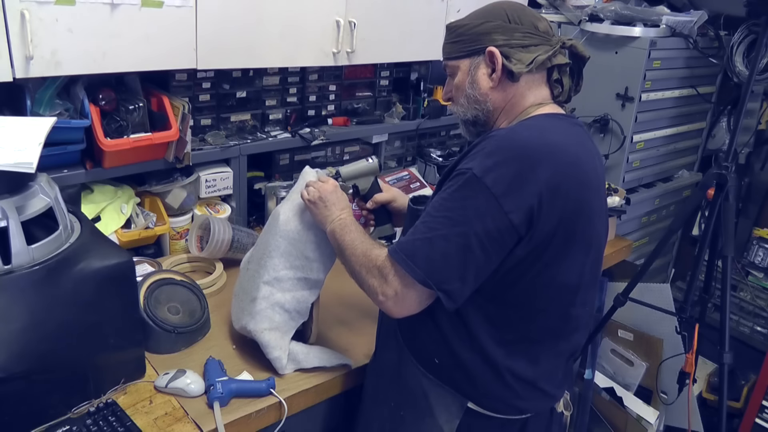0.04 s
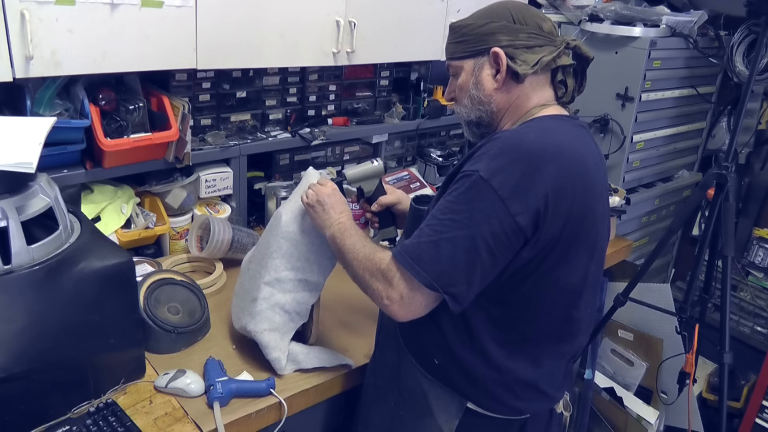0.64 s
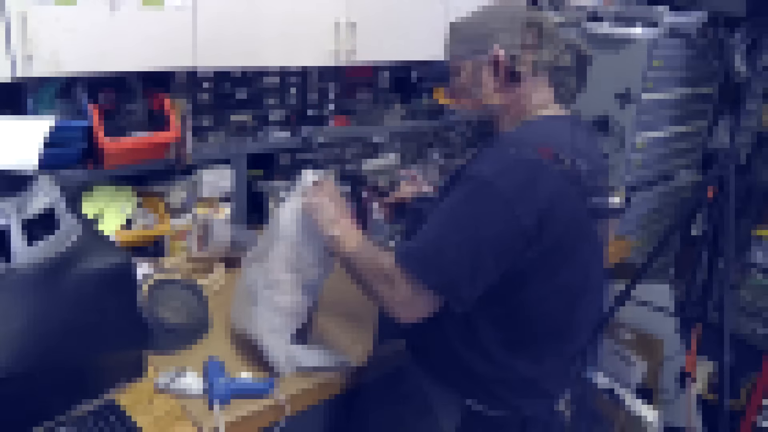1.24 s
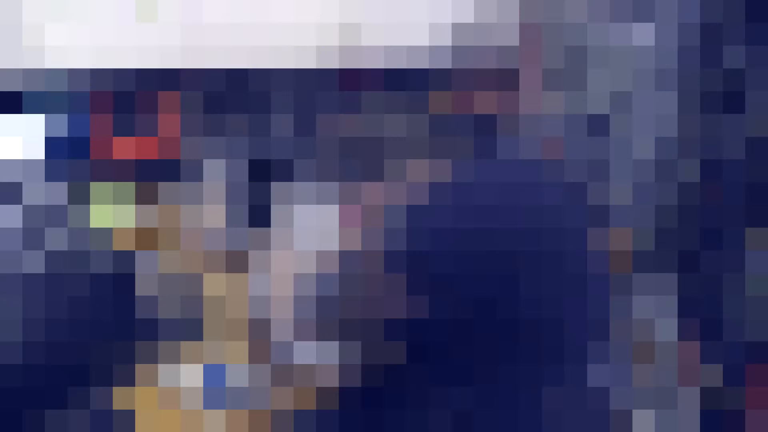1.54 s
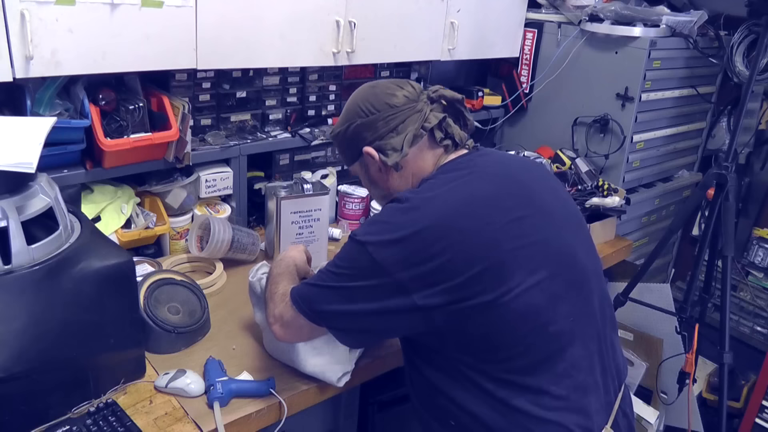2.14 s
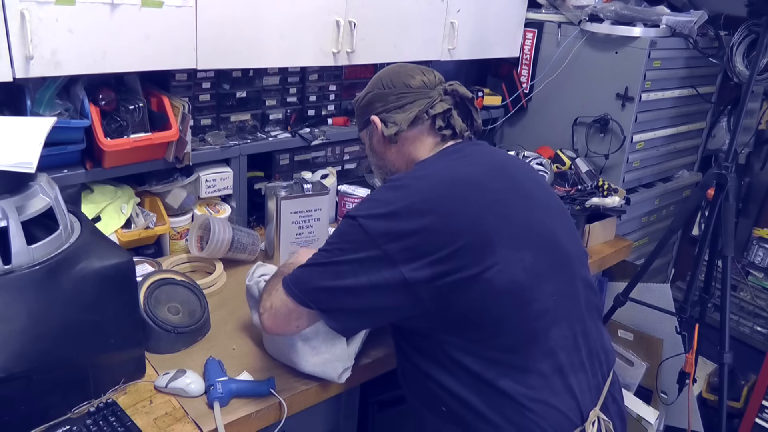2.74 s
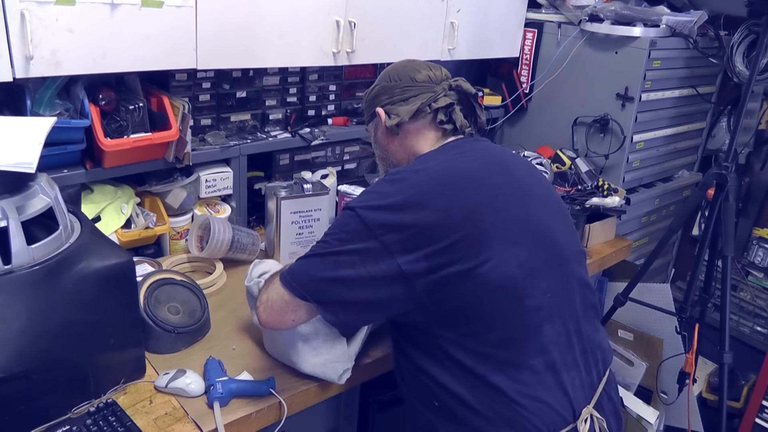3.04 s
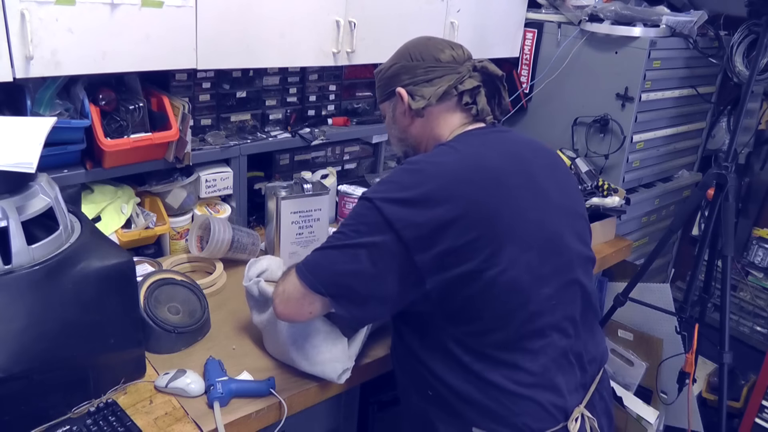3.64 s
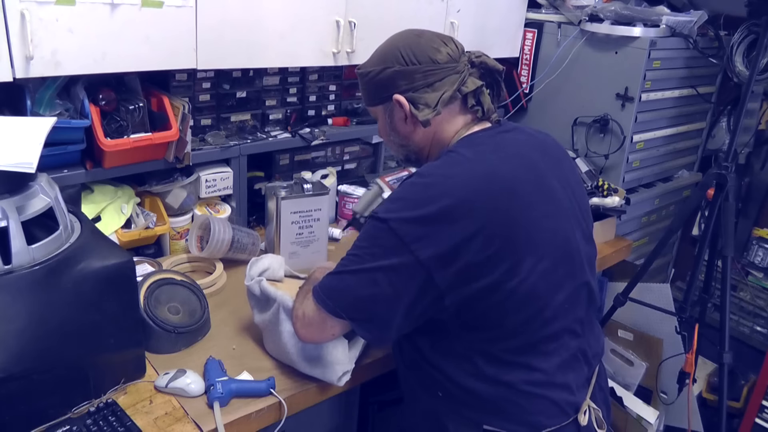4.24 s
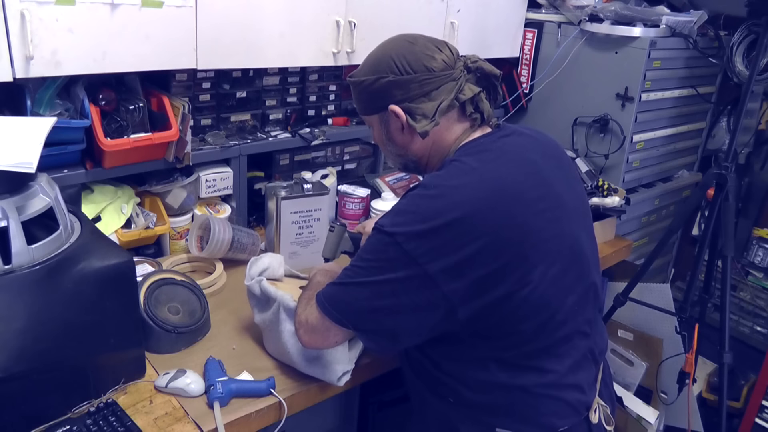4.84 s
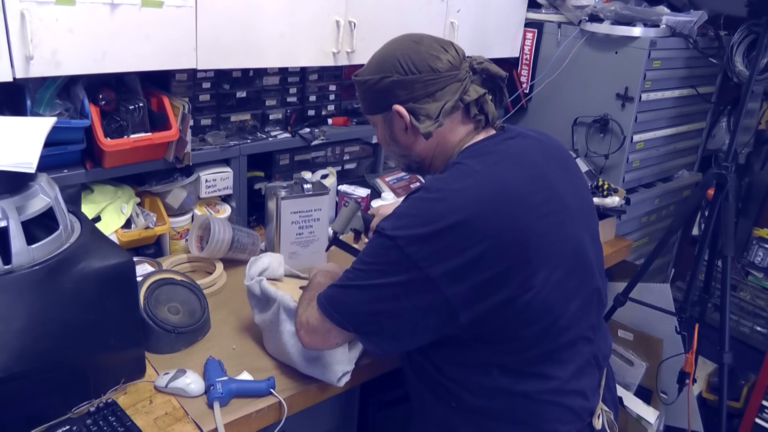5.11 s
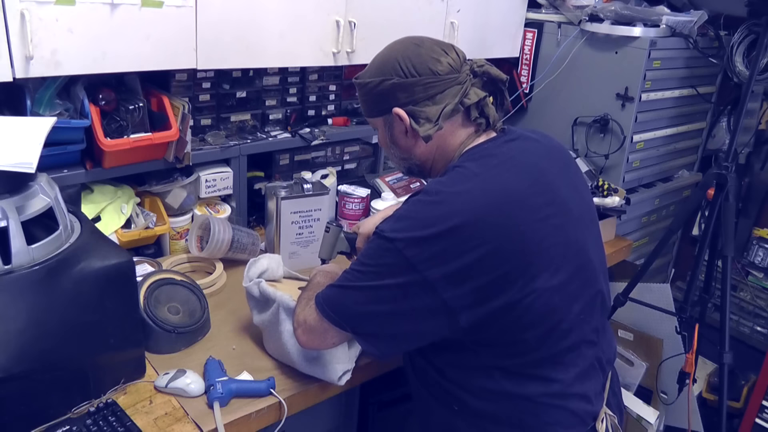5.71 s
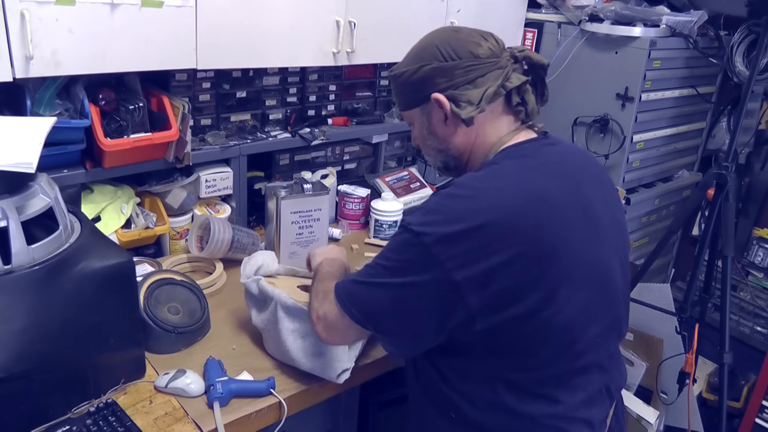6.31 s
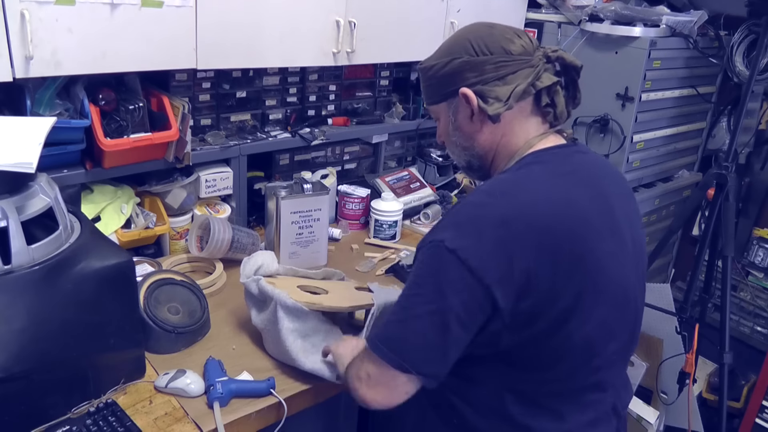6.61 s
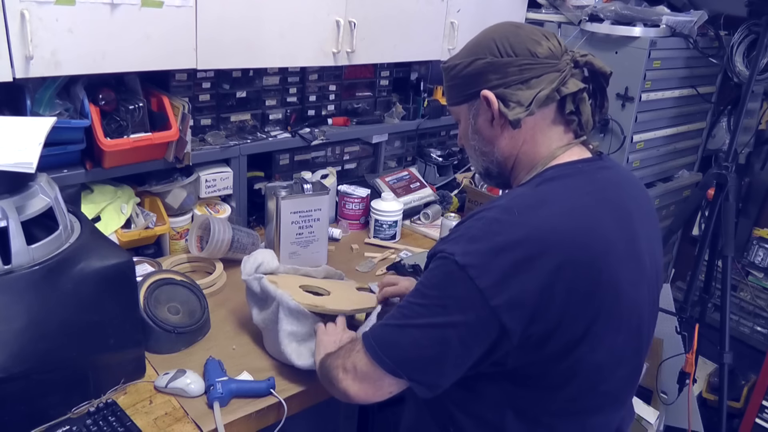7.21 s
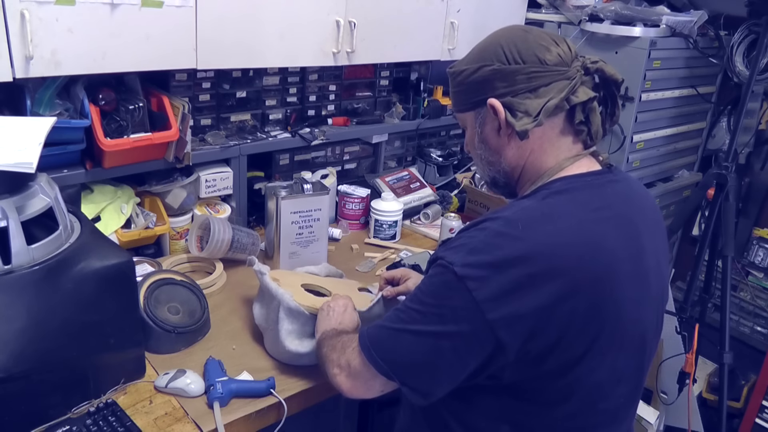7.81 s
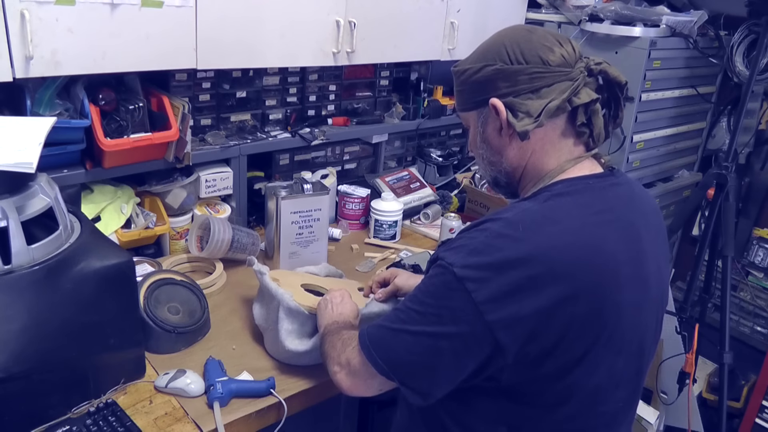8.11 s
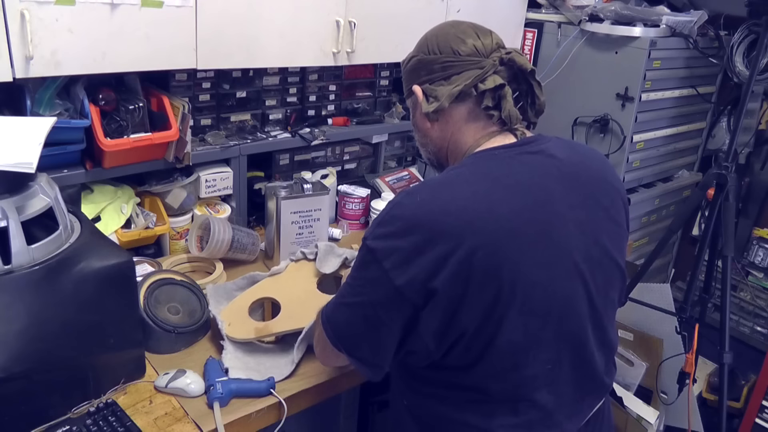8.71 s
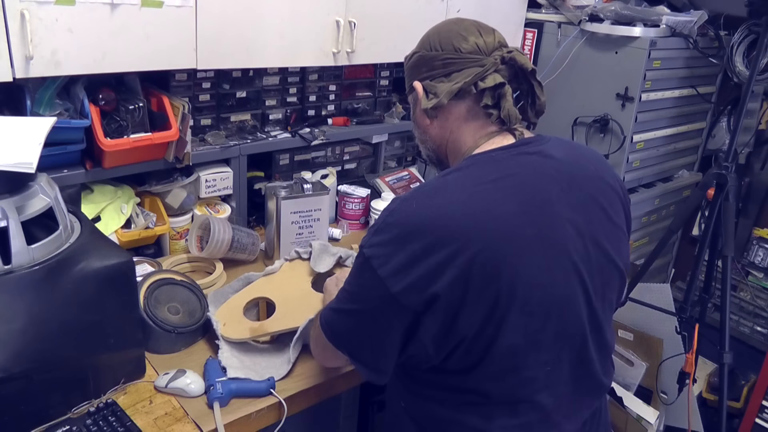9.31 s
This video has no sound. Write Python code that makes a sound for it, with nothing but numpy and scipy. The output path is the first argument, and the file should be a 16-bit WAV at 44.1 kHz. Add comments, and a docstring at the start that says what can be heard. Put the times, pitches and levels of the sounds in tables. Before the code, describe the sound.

A steady hiss of air and a faint low drone fill a small garage, heard in stereo from beside the workbench. The sound opens on the tail of an air stapler shot and its exhaust puff. A full, sharp shot cracks at 1 second, followed a split second later by a bright puff and a clack, as every shot is, with a short room echo. Cloth rustles softly and a wooden frame knocks on the bench at 1.7 seconds, then a faint thin squeak slides upward. Slight scuffs come around 3.5 seconds, and another rustle and knock at about 4.3. The stapler fires at 4.8 and 5.7 seconds, with a knock just before the second of these. The frame knocks again at 6.3 and 6.7 seconds amid light scuffs. A last loud shot comes at about 9 seconds. The hiss dips briefly after the shots.

```python
"""A small garage, a stereo microphone near the workbench: an air stapler tacks cloth to a wooden frame.
Each shot is a valve blast and a double blow of the driver; when the trigger is let go, the exhaust puffs
and the piston clacks home. Between shots the cloth rustles and the frame knocks on the bench.
Air hisses steadily behind it all. The recorder's gain control ducks after every shot."""
import sys
import numpy as np
from scipy import signal
from scipy.fft import rfft, irfft, next_fast_len
from scipy.io import wavfile
from scipy.ndimage import uniform_filter1d

SR = 44100
rng = np.random.default_rng(int(sys.argv[2]) if len(sys.argv) > 2 else 0)


def log_audio(samples):
    """Write samples as a 16-bit WAV file to the path given in sys.argv[1]."""
    # one column per channel
    frames = np.atleast_2d(samples).T
    # limit to full scale, then quantise
    limited = np.clip(frames, -1, 1)
    pcm = np.round(limited * 32767).astype(np.int16)
    wavfile.write(sys.argv[1], SR, pcm)


N = 412335
LEAD = 4410   # samples before time zero, where the first shot falls
TIME = np.arange(-LEAD, N) / SR
AGE = np.arange(SR // 2) / SR   # seconds into one short sound
LN_1000 = np.log(1000)   # a fall of 60 dB


def from_db(db):
    """Decibels to gain."""
    return 10 ** (np.asarray(db) / 20)


def rms_one(x):
    """Scale to rms 1."""
    return x / np.sqrt(np.mean(x ** 2) + 1e-20)


def at_hz(table, hz):
    """Read a table on a log-frequency axis."""
    frequencies, values = np.transpose(table)
    return np.interp(np.log(hz), np.log(frequencies), values)


def shaped(x, spectrum, size):
    """Filter by a table of levels, with an FFT of the given size."""
    hz = np.maximum(np.arange(size // 2 + 1) * SR / size, 1)
    return irfft(rfft(x, size) * from_db(at_hz(spectrum, hz)), size)


def noise(spectrum, size=len(TIME)):
    """Coloured noise of rms 1."""
    full = next_fast_len(size, True)
    return rms_one(shaped(rng.standard_normal(full), spectrum, full)[:size])


def burst(spectrum, rise, hold, t60):
    """Coloured noise that opens, stays and dies away; times in seconds."""
    envelope = np.clip(AGE / rise, 0, 1) * np.exp(-LN_1000 * np.clip((AGE - hold) / t60, 0, 10))
    return envelope * noise(spectrum, size=len(AGE))


def wavering_tone(hz, width_hz):
    """A tone of rms 1 that drifts in level and phase."""
    knots = np.arange(TIME[0], TIME[-1], 1 / width_hz)
    waver = np.interp(TIME, knots, rng.standard_normal((len(knots), 2)) @ [1, 1j])
    return rms_one(np.real(waver * np.exp(2j * np.pi * hz * TIME)))


def ring(modes, force=1.0 * (AGE == 0)):
    """A force, by default a unit click, sets modes ringing with alternating signs."""
    out = 0
    for k, (hz, db, t60) in enumerate(modes):
        r, w = np.exp(-LN_1000 / (t60 * SR)), 2 * np.pi * hz / SR
        mode = signal.lfilter([0, np.sin(w)], [1, -2 * r * np.cos(w), r * r], force + 1e-18)
        out = out + (-1) ** k * from_db(db) * mode
    return out


def add(track, start, sound):
    """Lay a sound into a track at its moment."""
    at = LEAD + round(start * SR)
    track[at:at + len(sound)] += sound[:len(track) - at]


def panned(left_db):
    """Channel gains for a left-minus-right level."""
    return from_db(np.array([[left_db], [-left_db]]) / 2)


# stereo width of the microphone: (frequency [Hz], side gain [dB])
MIC_WIDTH = [(50, -5), (160, 1), (260, -2.5), (400, 0.5), (800, -1.5), (1400, 0.5), (2400, -2.5),
             (3500, -3.5), (5000, -14.5), (7000, -5.5), (10000, 3.5), (13000, 1.5), (16000, -2)]
def microphone(front, diffuse):
    """Sound from the sides opens the image, except near 5 kHz where the two ports hear alike."""
    side = shaped(diffuse, MIC_WIDTH, next_fast_len(len(TIME) + SR))[:len(TIME)]
    return np.array([front + side, front - side])


# decay of the room: (frequency [Hz], t60 [s])
ROOM_DECAY = [(100, 0.83), (350, 0.5), (1400, 0.55), (3000, 0.46), (6000, 0.5256), (10000, 0.39),
              (16000, 0.2)]
# colour of its echoes: (frequency [Hz], level [dB])
ROOM_COLOUR = [(50, -16), (150, -6.5), (350, 0), (1000, 0.5), (3000, 2), (6000, 1), (9000, -2.5),
               (15000, 1)]
def echoes(early_db=-2.5, early_t60=0.043, fade_in_s=0.0067):
    """Quick reflections off bench and cabinets, then a tail that dies band by band."""
    t = np.arange(SR * 3 // 4) / SR
    edges = np.geomspace(40, 18000, 15)
    sources, out = rng.standard_normal((2, len(t))), 0
    early = from_db(early_db) * np.exp(-LN_1000 * t / early_t60)
    for k, (low, high) in enumerate(zip(edges, edges[1:])):
        hz = np.sqrt(low * high)
        band = signal.sosfilt(signal.butter(2, [low, high], "band", fs=SR, output="sos"), sources[k % 2])
        tail = np.exp(-LN_1000 * t / at_hz(ROOM_DECAY, hz))
        out = out + from_db(at_hz(ROOM_COLOUR, hz)) * band * (early + tail)
    out = out * np.clip(t / fade_in_s, 0, 1)
    return out / np.sqrt(np.sum(out ** 2))


def garage(x, wet_db, side_db):
    """The microphone hears the direct sound, then echoes from the front and sides."""
    front, sides = [signal.oaconvolve(x, echoes())[:len(TIME)] for _ in range(2)]
    return microphone(x + from_db(wet_db) * front, from_db(wet_db + side_db) * sides)


# drone of the shop: (frequency [Hz], level [dB])
DRONE_SPECTRUM = [(25, -32), (42, -31), (58, 4), (82, -12.5), (120, 1), (155, -8.5), (260, 1.5), (350, -9),
                  (600, -7), (900, -7.5), (1200, -16), (2000, -34)]
# course of the hum: (time [s], strength [0-1])
HUM_ENVELOPE = [(.1, 0), (.3, 1), (1.0, 1), (1.1, 0)]
def room_tone():
    """The shop drones low all around; a hum stops after a second."""
    drone = microphone(noise(DRONE_SPECTRUM), from_db(2.0) * noise(DRONE_SPECTRUM))
    hum = wavering_tone(hz=75, width_hz=4.13) * np.interp(TIME, *np.transpose(HUM_ENVELOPE))
    return from_db(-51) * drone * panned(-0.82) + from_db(-52) * hum


# hiss of air: (frequency [Hz], level [dB])
HISS_SPECTRUM = [(650, -28), (1100, -13), (1470, -9), (1590, -8), (2380, -5), (2920, -1.5), (3150, -4.5),
                 (4080, -1), (4610, -3), (5840, -0.5), (8170, -3), (10200, -1.5), (12400, -7),
                 (15100, -6.5), (16000, -21)]
# whistles in it: (frequency [Hz], width [Hz], level [dB])
HISS_WHISTLES = [(2950, 8.3, -59.5), (4200, 8.8, -58), (6900, 30, -65)]
def air_hiss():
    """Air hisses steadily across the image, with thin whistles in the centre."""
    whistles = sum(from_db(db) * wavering_tone(hz, width) for hz, width, db in HISS_WHISTLES)
    hiss = microphone(noise(HISS_SPECTRUM), from_db(-1.0) * noise(HISS_SPECTRUM))
    return from_db(-39) * hiss * panned(1.04) + whistles


# a faint squeak: (time [s], pitch [Hz], level [dB])
SQUEAK_GLIDE = [(2.05, 1320, -85), (2.11, 1350, -54), (2.36, 1556, -56.5), (2.44, 1600, -85)]
def cloth_squeak():
    """A thin, unsteady tone slides upward while the cloth is stretched."""
    s, hz, db = np.transpose(SQUEAK_GLIDE)
    phase = 2 * np.pi * np.cumsum(np.interp(TIME, s, hz)) / SR
    tone = rms_one(np.sin(phase) * wavering_tone(hz=25.7, width_hz=100))
    return from_db(np.interp(TIME, s, db)) * tone


# pulls on the cloth: (middle [s], level [dB], half length [s])
CLOTH_PULLS = [(1.576, -49, 0.13), (4.247, -44.5, 0.092), (6.663, -48, 0.04)]
# sliding cloth: (frequency [Hz], level [dB])
CLOTH_SPECTRUM = [(100, -15), (400, -8), (1600, 4), (4000, 4), (9000, -9), (16000, -15)]
def cloth_rustles(grain_db):
    """Cloth slides over the frame in grainy swells."""
    swell = sum(from_db(db) * np.exp(-np.minimum(((TIME - s) / half_length) ** 2, 20))
                for s, db, half_length in CLOTH_PULLS)
    rustle = swell * noise(CLOTH_SPECTRUM)
    grain = rms_one(uniform_filter1d(rng.standard_normal(len(TIME)), 400))
    return rustle * from_db(grain_db * grain)


# modes of the wooden frame: (frequency [Hz], level [dB], t60 [s])
FRAME_MODES = [(137.4, -2.5, .12), (172, -5.5, 0.1), (309, -7.5, 0.066), (470, -12.5, 0.055),
               (920, -19, 0.046), (1400, -10, 0.033), (2960, -1.5, 0.042), (3800, -16, .07)]
# scraping wood: (frequency [Hz], level [dB])
SCRAPE_SPECTRUM = [(500, 2), (1500, 3), (3900, 0.5), (5000, -5), (9000, -6), (16000, -20)]
def wood_contact(pitch_hz, spread, t60, scrape_db, body_db=-41, thud_db=4.0):
    """Wood meets wood with a rattle and scrape; padding dulls the contact, the grip damps the lows."""
    rattle = rng.standard_normal(len(AGE)) * np.exp(-LN_1000 * np.minimum(AGE / t60, 10))
    band = signal.butter(2, [pitch_hz / spread, pitch_hz * spread], "band", fs=SR, output="sos")
    cushion = np.clip(AGE / 0.0035, 0, 1)   # the cloth softens the first touch
    thud = from_db(thud_db) * signal.sosfilt(band, rattle * cushion)
    force = thud + from_db(scrape_db) * burst(SCRAPE_SPECTRUM, rise=0.0017, hold=0.0028, t60=t60)
    return force + from_db(body_db) * ring(FRAME_MODES, force)


# frame on bench: (time [s], level [dB], pitch [Hz], t60 [s], scrape [dB], settle delay [s], settle [dB])
FRAME_KNOCKS = [(1.7087, -9.5, 290, 0.052, -18, 0.021, -13), (3.4622, -25, 410, .1, -17, 0.026, -6),
                (4.362, -8.5, 510, 0.055, -32, 0.037, -14), (5.5157, -5, 404, 0.05, -24.5, 0.028, -6),
                (6.33, -4.5, 230, .1, -19, .02, -7.5), (6.7387, -10, 252, 0.12, -19.5, .029, -0.5)]
# light scuffs of frame and tool: (time [s], level [dB], pitch [Hz])
LIGHT_SCUFFS = [(3.721, -28.5, 450), (6.553, -35, 547), (6.6037, -33, 800), (6.769, -26, 1400),
                (7.3039, -33.5, 3000)]
def knocks_and_scuffs():
    """The frame lands on one edge, then settles with a second touch; scuffs touch only once."""
    out = np.zeros(len(TIME))
    for s, db, pitch_hz, t60, scrape_db, settle_s, settle_db in FRAME_KNOCKS:
        for delay, touch_db in ((0, 0), (settle_s, settle_db)):
            touch = wood_contact(pitch_hz, spread=1.72, t60=t60, scrape_db=scrape_db)
            add(out, s + delay, from_db(db + touch_db) * touch)
    for s, db, pitch_hz in LIGHT_SCUFFS:
        add(out, s, from_db(db) * wood_contact(pitch_hz, spread=4, t60=0.13, scrape_db=-8))
    return out


# the trigger is let go: (time [s], level [dB], piston delay [s])
TRIGGER_RELEASES = [(.085, -6.5, .021), (1.1646, -1.6, 0.025), (4.960, 0.3, 0.021), (5.828, 0, .021),
                    (9.107, 2.5, .027)]
# exhaust puff: (frequency [Hz], level [dB])
PUFF_SPECTRUM = [(80, -33), (550, -27), (1100, -10), (2200, -7.5), (4000, -5.5), (6200, 3), (7900, -1.5),
                 (10000, 2), (13000, -1), (16000, -9)]
# piston on its stop: (frequency [Hz], level [dB])
CLACK_SPECTRUM = [(60, -4), (200, 3), (520, -1.5), (850, -2.5), (1400, 8), (2200, -14), (2800, 4.5),
                  (4000, -20), (16000, -27)]
# clatter after it lands: (frequency [Hz], level [dB])
CLATTER_SPECTRUM = [(60, -12), (170, 6), (520, 3.5), (850, -7.5), (1400, 3), (2200, -7), (2800, -5),
                    (6500, -2), (10000, -3.5), (16000, -31)]
# modes of the piston: (frequency [Hz], level [dB], t60 [s])
PISTON_MODES = [(166, -1, 0.071), (293, -0.5, 0.061), (477, -0.5, 0.024), (1315, 3.5, 0.037),
                (2690, 0.5, 0.055), (6600, -3, 0.086)]
def trigger_releases(puff_db, clatter_db, clack_db, ring_db):
    """The cylinder vents in a bright puff; the piston clacks on its stop and lets the last air out."""
    out = np.zeros(len(TIME))
    for s, db, landing_s in TRIGGER_RELEASES:
        add(out, s, from_db(db + puff_db) * burst(PUFF_SPECTRUM, rise=0.0061, hold=0.021, t60=0.19))
        clack = from_db(clack_db) * burst(CLACK_SPECTRUM, rise=0.00012, hold=0.00054, t60=0.024)
        ringing = from_db(ring_db) * ring(PISTON_MODES)
        clatter = from_db(clatter_db) * burst(CLATTER_SPECTRUM, rise=0.0075, hold=0.027, t60=0.15)
        add(out, s + landing_s, from_db(db) * (clack + ringing + clatter))
    return out


SEEP_LEAD_S, STRIKE_S, SEAT_S = .008, .0046, .009   # seep before the valve opens, two blows after
SEEP_TRADE = 0.99   # dB more seep for each dB a slowly squeezed valve takes from the blast
# the valve opens: (time [s], level [dB], valve snap [dB])
STAPLE_SHOTS = [(-.058, -7.5, -10), (1.037, -1.9, 3.5), (4.8309, -1.3, 3), (5.6844, 0.5, -5.5),
                (8.9533, 2, -5.5)]
# valve blast: (frequency [Hz], level [dB])
BLAST_SPECTRUM = [(200, -22), (1500, -19), (3500, -4), (6000, 6.5), (8000, -1.5), (11000, 4), (16000, -3)]
# seeping and spent air: (frequency [Hz], level [dB])
ESCAPING_AIR = [(100, -21), (350, 3.5), (1000, 3), (2000, -4), (2800, 4), (3300, 0), (5600, 3), (7200, 1),
                (8500, -4), (11000, -12), (16000, -22)]
# driver on staple: (frequency [Hz], level [dB])
CRACK_SPECTRUM = [(50, -24), (150, -6.5), (320, 8.5), (560, 3.5), (800, 1.5), (1700, -1.5), (3300, -2),
                  (5800, -1), (8000, -5.5), (11000, -5.5), (16000, -19)]
# modes of the driver: (frequency [Hz], level [dB], t60 [s])
DRIVER_MODES = [(333, -11, 0.068), (627, 2.5, 0.026), (1600, 1.5, 0.059), (2074, 10, 0.034),
                (2700, -9, 0.038), (5600, 13, 0.05), (6100, -8, 0.037)]
def stapler_shots(blast_db, strike_db, seat_db, ring_db, seep_db, spent_db):
    """Air seeps, then bursts in; the driver strikes the staple, seats it, and spent air rushes out."""
    out = np.zeros(len(TIME))
    ringing = from_db(ring_db) * ring(DRIVER_MODES)
    for s, db, snap_db in STAPLE_SHOTS:
        seep = burst(ESCAPING_AIR, rise=0.0029, hold=0.0086, t60=0.028)
        add(out, s - SEEP_LEAD_S, from_db(db + seep_db - SEEP_TRADE * snap_db) * seep)
        blast = burst(BLAST_SPECTRUM, rise=0.0028, hold=0.0069, t60=0.013)
        add(out, s, from_db(db + blast_db + snap_db) * blast)
        for delay, blow_db in ((STRIKE_S, strike_db), (SEAT_S, seat_db)):
            crack = burst(CRACK_SPECTRUM, rise=0.00032, hold=0.0023, t60=0.021)
            add(out, s + delay, from_db(db + blow_db) * (crack + ringing))
        spent = burst(ESCAPING_AIR, rise=0.0021, hold=0.011, t60=0.64)
        add(out, s + SEAT_S, from_db(db + spent_db) * spent)
    return out


def shot_jolts(hz, t60, level_db, right_db):
    """Each shot shakes the microphone with a low thump, opposite in the two channels."""
    out = np.zeros(len(TIME))
    for s, db, _ in STAPLE_SHOTS:
        add(out, s + STRIKE_S, from_db(db) * ring([(hz, level_db, t60)]))
    return np.array([out, -from_db(right_db) * out])


def scene():
    """From beside the bench: stapler in the centre, frame and cloth slightly to the right."""
    shots = stapler_shots(blast_db=-9, strike_db=-7, seat_db=-3,
                          ring_db=-20.5, seep_db=-35.5, spent_db=-20.5)
    firing = garage(shots, wet_db=-6.5, side_db=-1)
    thumps = shot_jolts(hz=135, t60=0.023, level_db=-0.5, right_db=3.5)
    releases = trigger_releases(puff_db=-15, clatter_db=-19.5, clack_db=-14.5, ring_db=-20)
    venting = garage(releases, wet_db=-7, side_db=-1)
    frame_and_cloth = knocks_and_scuffs() + cloth_rustles(grain_db=1.0) + cloth_squeak()
    handling = garage(frame_and_cloth, wet_db=-5.5, side_db=-2) * panned(-1.3)
    return (air_hiss() + room_tone() + handling + venting + firing + thumps)[:, LEAD:]


def gain_control(x, threshold_db, release_db_per_s, window_s):
    """The recorder's gain drops at once on loud sound and creeps back."""
    power = uniform_filter1d(np.mean(x ** 2, axis=0), round(window_s * SR))
    over_db = np.maximum(10 * np.log10(np.maximum(power, 1e-12)) - threshold_db, 0)
    recovery_db = release_db_per_s * np.arange(N) / SR
    return x * from_db(recovery_db - np.maximum.accumulate(over_db + recovery_db))


def record(dry):
    """The recorder ducks, rounds the peaks and cuts the treble above 16.1 kHz."""
    ducked = gain_control(dry, threshold_db=-13, release_db_per_s=18.5, window_s=0.0049)
    lowpass = signal.ellip(12, .1, 80, 16100, fs=SR, output="sos")
    return signal.sosfilt(lowpass, np.tanh(ducked))


dry = scene()
out = record(dry)
log_audio(out)
```